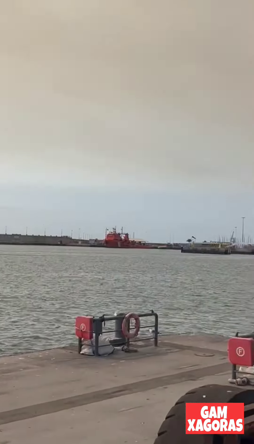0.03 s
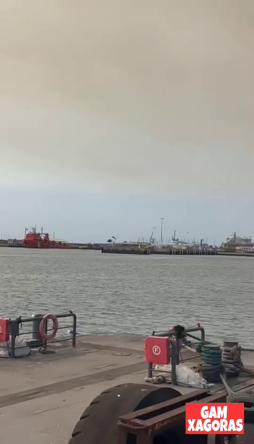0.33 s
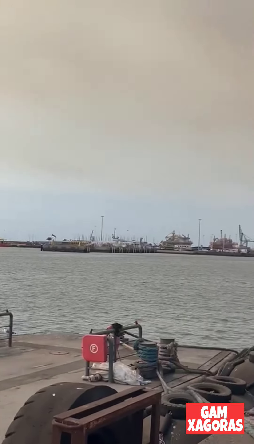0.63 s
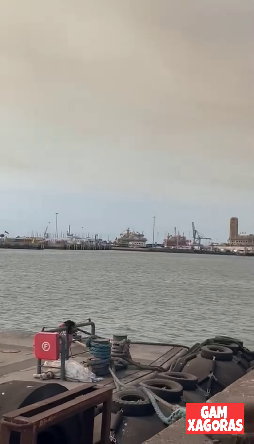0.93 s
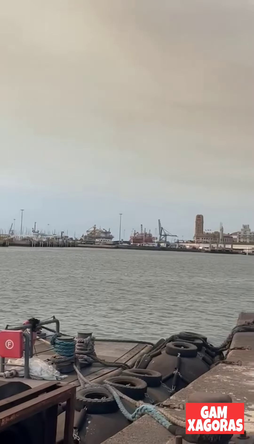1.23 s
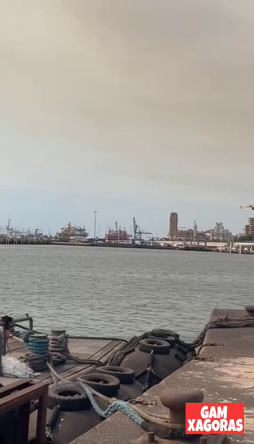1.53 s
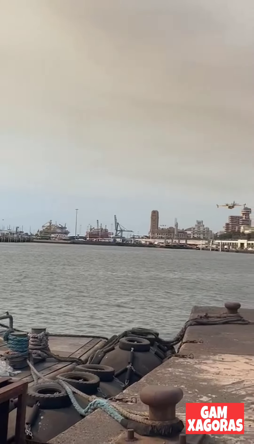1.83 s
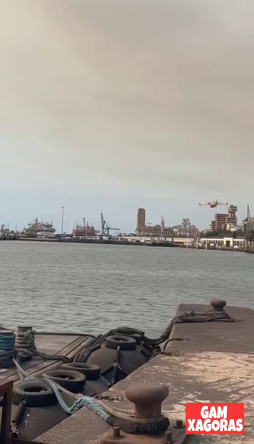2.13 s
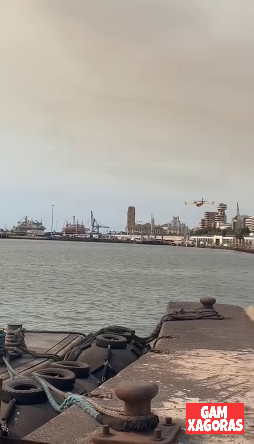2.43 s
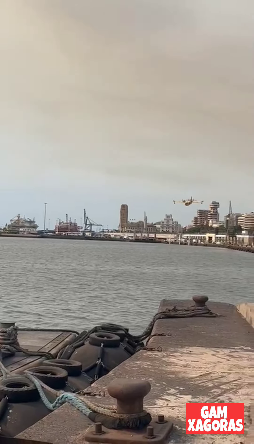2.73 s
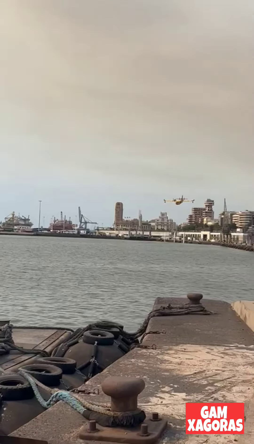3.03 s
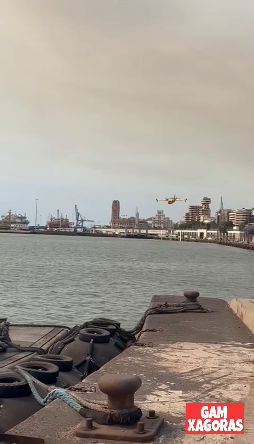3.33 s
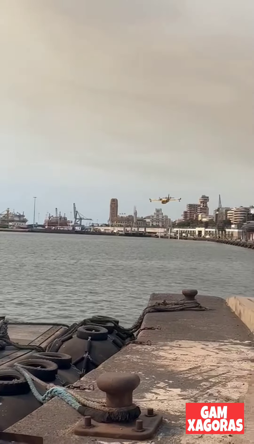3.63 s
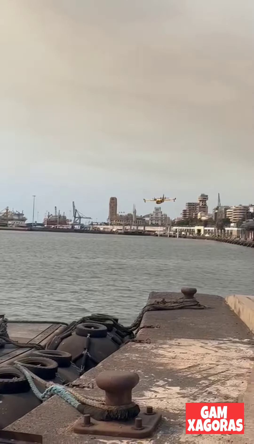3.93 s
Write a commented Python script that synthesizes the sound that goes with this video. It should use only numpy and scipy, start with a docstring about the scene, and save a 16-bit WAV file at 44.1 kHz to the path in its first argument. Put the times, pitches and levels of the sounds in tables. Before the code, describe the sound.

Low propeller aircraft drone and distant roar, with gusts of wind thumping on the microphone.

```python
"""Seaplane over a windy harbour

A propeller seaplane flies low past a quay. Its engine drone and rumble fill the first second and
a half, fall away, and the drone swells again under a distant roar that also reflects off the water.
Wind flutters, patters and thumps on the microphone ports; a thin machinery hiss fades early."""
import sys
import numpy as np
from scipy import signal
from scipy.fft import rfft, irfft
from scipy.io import wavfile
from scipy.ndimage import uniform_filter1d, minimum_filter1d

SR = 44100
rng = np.random.default_rng(int(sys.argv[2]) if len(sys.argv) > 2 else 0)


def pcm_store(signal):
    """Save signal as 16-bit PCM."""
    levels = np.round(np.clip(np.atleast_2d(signal), -1, 1) * 32767)
    wavfile.write(sys.argv[1], SR, levels.astype(np.int16).T)


N = 176400
TIME = np.arange(N) / SR
BIN_HZ = np.arange(N // 2 + 1) * SR / N


def from_db(db):
    """Decibels to gain."""
    return 10 ** (np.asarray(db) / 20)


def unit_rms(x):
    """Scale to an rms of 1."""
    return x / np.sqrt(np.mean(x ** 2) + 1e-20)


def automation(rows):
    """Each column of a breakpoint curve at every sample."""
    times, *columns = np.transpose(rows)
    return [np.interp(TIME, times, column) for column in columns]


def fader(curve):
    """Gain at every sample from a dB curve."""
    return from_db(automation(curve)[0])


def drift(rate_hz):
    """A smooth random wobble of spread 1 that changes about rate_hz times a second."""
    pole = np.exp(-80 * np.pi * rate_hz / SR)
    white = rng.standard_normal(N // 40 + 2002)   # one value every 40 samples
    slow = signal.lfilter([1], [1, -2 * pole, pole * pole], white)[2000:]
    return np.interp(np.arange(N) / 40, np.arange(len(slow)), unit_rms(slow))


def turbulence(eq, shared_db, patchy_db, rate_hz):
    """Coloured noise whose octaves flicker together (shared) and each on its own (patchy); rms 1."""
    hz, db = np.transpose(eq)
    octave = np.log2(np.maximum(BIN_HZ, 1))
    spectrum = rfft(rng.standard_normal(N)) * from_db(np.interp(octave, np.log2(hz), db))
    together_db = shared_db * drift(rate_hz)
    band = np.clip(np.round(octave), 6, 13)
    out = 0
    for k in np.unique(band):
        out += irfft(spectrum * (band == k), N) * from_db(together_db + patchy_db * drift(rate_hz))
    return unit_rms(out)


def pop(t, hz, ring_cycles):
    """A damped pressure pulse from t = 0, peak 1; its damping reaches 60 dB after ring_cycles."""
    cycles = np.maximum(t, 0) * hz
    wave = np.sin(2 * np.pi * cycles) * cycles * from_db(-60 * cycles / ring_cycles)
    return wave / np.abs(wave).max()


# Fade of the hiss: time_s, level_db
HISS_FADER = [(0, -46.5), (.12, -47.5), (.3, -52.5), (.58, -47), (.75, -53.5), (1.0, -54.5), (1.25, -58.5),
              (1.5, -56.5), (2.0, -62), (3, -62.5), (4, -63.5)]
# Its tone in the centre and at the sides: freq_hz, gain_db
HISS_MID_EQ = [(4000, -32), (5500, -12), (6100, 1), (6320, 6.5), (6600, 0), (7300, -1), (8150, 4.5),
               (8700, 5), (9000, -15.5), (10000, -18)]
HISS_SIDE_EQ = [(6500, -32.5), (7700, -7), (8400, -5.5), (9000, 0), (10000, -16)]

def machinery_hiss(eq):
    """A thin, high hiss of machinery that fades early."""
    return fader(HISS_FADER) * turbulence(eq, shared_db=0.64, patchy_db=1.2, rate_hz=8.6)


def low_cut(x, edge_hz, order):
    """High-pass with a moving edge, in third-octave bands."""
    band = np.round(3 * np.log2(np.clip(BIN_HZ, 40, 1300)))
    spectrum = rfft(x)
    out = 0
    for k in np.unique(band):
        centre_hz = 2 ** (k / 3)
        out += irfft(spectrum * (band == k), N) / np.sqrt(1 + (edge_hz / centre_hz) ** (2 * order))
    return out


# Wind bed, with the low cut that thins both it and the gust: time_s, level_db, low_cut_hz
WIND_MOVES = [(0, -42, 527), (.3, -38.5, 320), (.6, -43.5, 251), (.9, -42.5, 203), (1.4, -33.5, 143),
              (1.85, -35.5, 98.05), (2.1, -26, 78.4), (2.37, -38.5, 70), (2.5, -29.5, 60),
              (2.8, -28, 44.77), (3.05, -29.5, 41.02), (3.15, -30.5, 255), (3.4, -30, 550), (4, -31, 688.5)]
# Strong early gust, ahead of the low cut: time_s, level_db
GUST_FADER = [(0, -34.5), (.3, -34.5), (.6, -32), (.8, -28), (.96, -33), (1.02, -18), (1.13, -27),
              (1.34, -21.5), (1.41, -39.5), (1.48, -30.5), (1.7, -51), (2, -61.5)]
# Tone of each: freq_hz, gain_db
WIND_EQ = [(30, -4), (70, 10), (150, 6.5), (300, 6), (500, 8.5), (750, 7), (1100, 5), (1450, -1),
           (1800, -13.5), (2300, -37.5), (3500, -61.5)]
GUST_EQ = [(70, -23), (150, 6.5), (240, -1.5), (340, 6), (500, 2), (750, -3.5), (1200, -21.5),
           (2000, -59.5), (4000, -85.5)]

def port_wind():
    """Lumpy wind that pushes the two microphone ports in opposite directions."""
    level_db, low_cut_hz = automation(WIND_MOVES)
    flutter = from_db(level_db) * turbulence(WIND_EQ, shared_db=1.0, patchy_db=1.8, rate_hz=11)
    gust = fader(GUST_FADER) * turbulence(GUST_EQ, shared_db=1.5, patchy_db=0.0, rate_hz=28)
    chop = unit_rms(from_db(drift(39)))   # lumps of about 1 dB
    return low_cut((flutter + gust) * chop, low_cut_hz, order=15)


# Patter between the thumps: time_s, level_db
EDDY_FADER = [(0, -50), (.7, -51), (.9, -45), (1.1, -32.5), (1.18, -38.5), (1.33, -33), (1.45, -43.5),
              (2.05, -56.5), (2.2, -39), (2.45, -34.5), (2.75, -44.5), (3.0, -41), (3.33, -38.5),
              (3.7, -43.5), (4, -45)]
# Blend of eddies, large to small: pitch_hz, gain_db
EDDY_BLEND = [(270, 4.5), (390, 2), (520, 0), (720, -3.5), (1020, -5)]

def eddies(hits_per_s=45, spread_db=1.5):
    """Small eddies patter on the ports at random, one stream of pops for each size."""
    out = 0
    for pitch_hz, gain_db in EDDY_BLEND:
        hits = (rng.random(N) < hits_per_s / SR) * rng.choice([-1, 1], N)
        strength = from_db(spread_db * np.minimum(rng.standard_normal(N), 1))
        pulse = pop(TIME[:SR // 20], pitch_hz, ring_cycles=3.9)
        out += from_db(gain_db) * unit_rms(signal.fftconvolve(hits * strength, pulse)[:N])
    return fader(EDDY_FADER) * unit_rms(out)


# Wind hits, ahead of their high cut: start_s, level_db, pitch_hz, puff_decay_s, snap_db
THUMP_CUES = [(.628, -20, 550, 0.015, -30), (.858, -21, 606, 0.034, -23), (.949, -20, 450, 0.0076, -22),
              (1.023, -13.5, 376, 0.017, -36), (1.062, -8, 372, 0.021, -19.5), (1.265, -13, 412, .01, -28),
              (1.310, -5.5, 370, 0.011, -13.5), (1.326, -8, 333, .022, -32),
              (1.354, -9.5, 500, 0.0081, -22.5), (1.364, -18, 563, .007, -29),
              (1.407, -16.5, 480, 0.0053, -22), (1.7275, -19.5, 567, 0.0059, -28),
              (1.909, -21.5, 460.4, 0.019, -30), (2.164, -22.5, 387, 0.018, -29),
              (2.243, -23.5, 304, 0.012, -30), (2.297, -23.5, 355, 0.01, -28),
              (2.41, -22.5, 560, 0.043, -32), (2.44, -29, 500.5, 0.0086, -27),
              (2.515, -29, 703.6, 0.031, -23), (2.69, -30, 600, 0.0065, -23),
              (2.822, -25, 309.6, .015, -29), (2.97, -23.5, 530, 0.011, -22),
              (3.031, -23.5, 1020, 0.013, -33), (3.103, -23, 889, 0.0079, -35),
              (3.242, -24, 629, 0.0051, -17), (3.293, -28, 504, .005, -22), (3.32, -25, 383, 0.017, -21)]

def thumps(puff_db=-10, puff_rise_s=0.0041, puff_edge_ratio=1.41, snap_hz=960, high_cut_hz=1590):
    """Single eddies hit the ports: a snap and a short, dull pop inside a puff of noise."""
    out, white = np.zeros(N), rng.standard_normal(N)
    for start_s, level_db, pitch_hz, puff_decay_s, snap_db in THUMP_CUES:
        near = np.abs(TIME - start_s) < .1
        t = TIME[near] - start_s
        edges_hz = [pitch_hz / puff_edge_ratio, pitch_hz * puff_edge_ratio]
        air = signal.sosfilt(signal.butter(2, edges_hz, "band", fs=SR, output="sos"), white[near])
        envelope = np.exp(-(t / np.where(t < 0, puff_rise_s, puff_decay_s)) ** 2)
        puff = from_db(puff_db) * unit_rms(air) * envelope
        body = pop(t, pitch_hz, ring_cycles=4.2)
        snap = pop(t, snap_hz, ring_cycles=3.4)
        out[near] += from_db(level_db) * (body + puff) + from_db(snap_db) * snap
    return signal.sosfilt(signal.butter(4, high_cut_hz, fs=SR, output="sos"), out)


# Brief whooshes in the distance: peak_s, level_db, centre_hz, fade_s
SWELL_CUES = [(.12, -36.5, 1462, 0.11), (.12, -42, 2107, 0.093), (.656, -42.5, 1744, 0.066),
              (1.78, -48, 2480, .065), (2.24, -47, 2250, 0.054), (2.29, -42.5, 3170, 0.057),
              (2.61, -44.5, 2840, 0.062), (3.035, -33.5, 1040, 0.019), (3.06, -44, 2080, 0.054),
              (3.174, -45.5, 3225, 0.047), (3.81, -43.5, 2840, 0.059), (3.97, -43, 3082, .06)]

def swells(width_hz=285, sag_octaves_per_s=.6):
    """Resonances of the distant rush swell, sink in pitch and fade."""
    out = np.zeros(N)
    narrow = signal.butter(2, width_hz / 2, fs=SR, output="sos")
    for peak_s, level_db, centre_hz, fade_s in SWELL_CUES:
        near = np.abs(TIME - peak_s) < .3
        t = TIME[near] - peak_s
        phase = 2 * np.pi * np.cumsum(centre_hz * 2 ** (-sag_octaves_per_s * t)) / SR
        slow_noise = signal.sosfilt(narrow, rng.standard_normal((2, len(t))))
        rush = unit_rms(slow_noise[0] * np.cos(phase) + slow_noise[1] * np.sin(phase))
        out[near] += from_db(level_db) * rush * np.exp(-(t / fade_s) ** 2)
    return out


def off_water(x, echo_gain=0.12, delay_s=0.00112, wander_s=.00009):
    """Add the reflection from the water; its delay wanders, so the sound swirls."""
    lag = (delay_s + wander_s * drift(1.53)) * SR
    return unit_rms(x + echo_gain * np.interp(np.arange(N) - lag, np.arange(N), x))


# The plane's midrange roar, throaty growl and upper wash: time_s, level_db
ROAR_FADER = [(0, -34.5), (.14, -37.5), (.4, -37.5), (.65, -37), (1.15, -43.5), (1.7, -38), (1.95, -37.5),
              (2.05, -42.5), (2.24, -34.5), (2.5, -37), (2.8, -37), (3.2, -41), (3.55, -42.5),
              (3.68, -45.5), (3.82, -38.5), (4, -35.5)]
THROAT_FADER = [(0, -67), (1.3, -51), (1.5, -39), (2.05, -53.5), (2.3, -45), (2.75, -55), (3.3, -40.5),
                (3.7, -38.5), (4, -38)]
WASH_FADER = [(0, -41.5), (.4, -45.5), (.7, -43.5), (1.25, -46), (1.75, -43), (2.0, -41.5), (2.3, -41.5),
              (2.6, -41), (3.0, -42), (3.18, -40), (3.4, -44), (3.7, -42), (4, -37.5)]
# Tone of each: freq_hz, gain_db
ROAR_EQ = [(150, -21), (400, -6), (600, -3), (850, -4.5), (1300, -0.5), (1900, -6), (2600, -20.5),
           (4000, -53.5)]
THROAT_EQ = [(230, -33), (360, 2), (600, 5), (800, -2), (1000, -41), (1600, -33)]
WASH_EQ = [(900, -29), (1500, -10), (2100, 4.5), (2900, 2), (3400, -0.5), (4200, -9), (4800, -10.5),
           (5500, -12.5), (6300, -13.5), (7200, -24.5), (8600, -40.5), (10000, -14)]

def distant_roar(phase, rasp_depth=0.053):
    """The plane's roar, a growl that grows as it nears, and a wash chopped by the propeller."""
    roar = off_water(turbulence(ROAR_EQ, shared_db=-0.5, patchy_db=1.8, rate_hz=11))
    throat = turbulence(THROAT_EQ, shared_db=5.0, patchy_db=-0.7, rate_hz=47)
    wash = off_water(turbulence(WASH_EQ, shared_db=-0.36, patchy_db=.5, rate_hz=15))
    rasp = 1 + rasp_depth * np.sin(phase)
    return fader(ROAR_FADER) * roar + fader(THROAT_FADER) * throat + fader(WASH_FADER) * wash * rasp


def whistle(pitch_hz=7025, waver_hz=12):
    """A faint, wavering whistle that creeps in near the end."""
    fade_in = fader([(3.3, -84), (3.55, -68), (4, -64)])   # time_s, level_db
    return fade_in * np.sin(2 * np.pi * np.cumsum(pitch_hz + waver_hz * drift(60)) / SR)


# Low-end weight of the engine: time_s, level_db
RUMBLE_FADER = [(0, -12), (.25, -15), (.42, -15.5), (.7, -16.5), (.85, -14), (.895, -18.5), (.94, -12.5),
                (1.0, -17.5), (1.07, -12), (1.15, -19), (1.23, -17.5), (1.315, -7), (1.39, -18.5),
                (1.6, -27.5), (2.0, -27.5), (2.28, -26.5), (2.7, -28.5), (2.88, -27), (3.3, -24.5),
                (3.65, -29.5), (4, -27)]
# Its tone: freq_hz, gain_db
RUMBLE_EQ = [(15, -46), (28, -28), (40, -7.5), (62, 2.5), (100, 0), (128, -1.5), (160, 0.4), (190, -4),
             (230, -5), (290, -8.5), (400, -15), (520, -20.5), (750, -45), (1500, -58.5), (3500, -86)]

def engine_rumble():
    """Lumpy low noise around the drone."""
    return fader(RUMBLE_FADER) * turbulence(RUMBLE_EQ, shared_db=1.23, patchy_db=2.5, rate_hz=17.2)


# The engine note, falling away and swelling back: time_s, pitch_hz, level_db
DRONE_MOVES = [(0, 75.4, -22.5), (.1, 76.53, -15.5), (.4, 75.88, -16), (.65, 75.75, -13),
               (.85, 75.67, -15.5), (1.33, 76.63, -13), (1.4, 75.5, -21), (1.75, 74.4, -32),
               (1.95, 74.66, -47), (2.9, 74.5, -30.5), (3.1, 75.9, -26), (3.6, 74.53, -28),
               (3.73, 74.8, -19), (3.83, 74.4, -26.5), (4, 75.65, -19.5)]

def blade_phase(wander_hz=0.51):
    """Phase of the propeller's blade beat, slightly unsteady in pitch."""
    pitch_hz = automation(DRONE_MOVES)[0] + wander_hz * drift(4.03)
    return 2 * np.pi * np.cumsum(pitch_hz) / SR


# Overtones against the engine's fundamental: harmonic_number, gain_db
DRONE_OVERTONES = [(2, -17), (3, -19)]

def engine_drone(phase, waver_db=0.57, slip_rad=2.24):
    """A nearly pure engine tone at the blade beat, with weak, unsteady overtones."""
    tone = np.sin(phase)
    for harmonic, gain_db in DRONE_OVERTONES:
        tone += from_db(gain_db) * np.sin(harmonic * phase + slip_rad * drift(2.64))
    level_db = automation(DRONE_MOVES)[1] + waver_db * drift(17)
    return np.sqrt(2) * tone * from_db(level_db)


def scene():
    """Plane, hiss and wind hits sit in the centre; the wind bed and a little hiss spread wide."""
    phase = blade_phase()
    plane = engine_drone(phase) + engine_rumble() + distant_roar(phase) + whistle() + swells()
    mid = plane + machinery_hiss(HISS_MID_EQ) + thumps() + eddies()
    side = port_wind() + from_db(-10.5) * machinery_hiss(HISS_SIDE_EQ)
    return np.array([mid + side, mid - side])


def record(dry, band_hz=5033, band_width_hz=345, ceiling=.94, limiter_s=.008, stop_hz=10582):
    """Turn one narrow treble band to opposite phase left and right, limit the peaks, cut the top."""
    turn = np.pi / 2 * np.exp(-(2 * (BIN_HZ - band_hz) / band_width_hz) ** 2)
    widened = irfft(rfft(dry) * np.exp(1j * np.array([turn, -turn])), N)
    span = int(limiter_s * SR) + 1
    safe_gain = 1 / np.maximum(np.abs(widened).max(axis=0) / ceiling, 1)
    limited = widened * uniform_filter1d(minimum_filter1d(safe_gain, span), span)
    return signal.sosfilt(signal.cheby2(12, 60, stop_hz, fs=SR, output="sos"), limited)


dry = scene()
out = record(dry)
pcm_store(out)
```